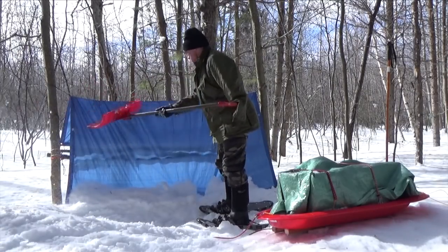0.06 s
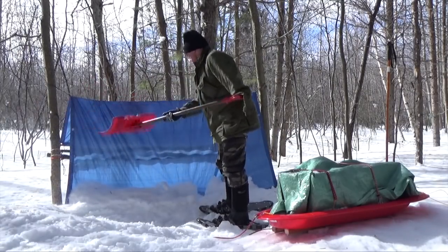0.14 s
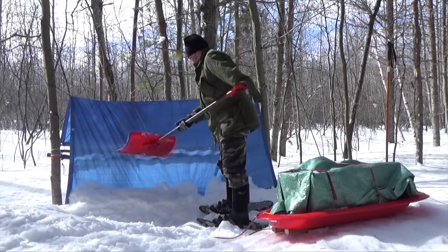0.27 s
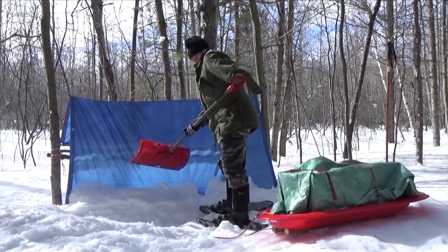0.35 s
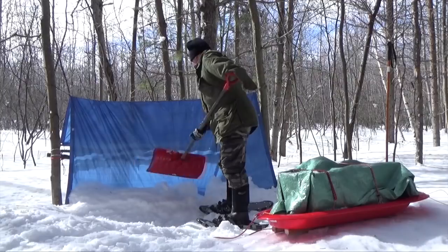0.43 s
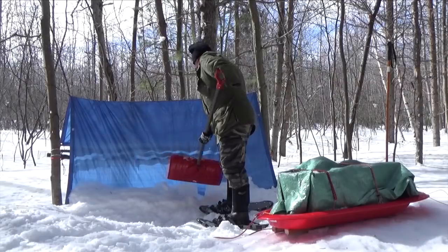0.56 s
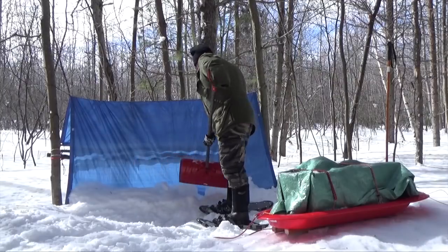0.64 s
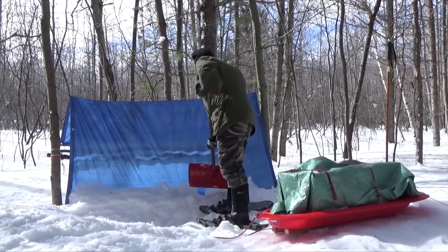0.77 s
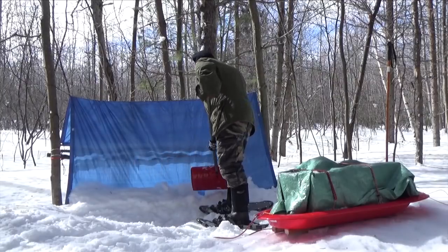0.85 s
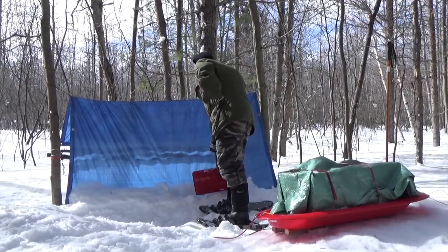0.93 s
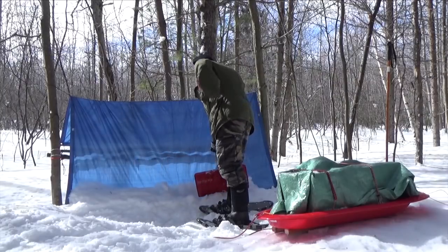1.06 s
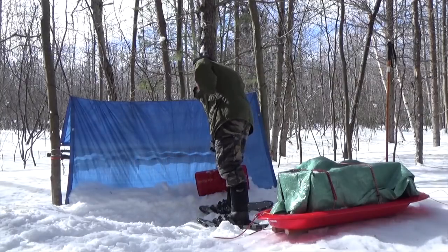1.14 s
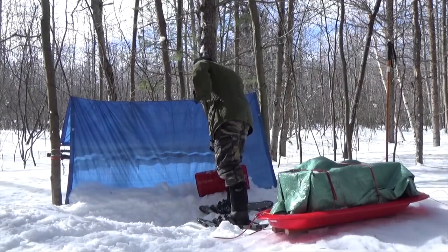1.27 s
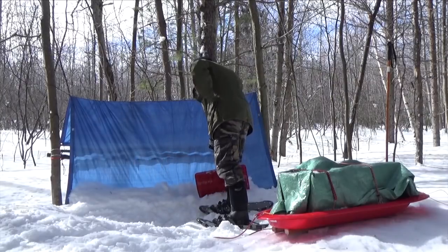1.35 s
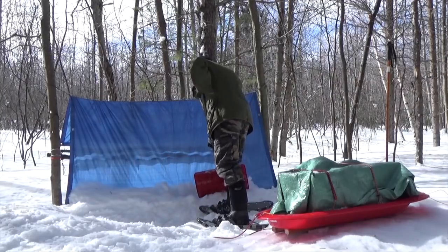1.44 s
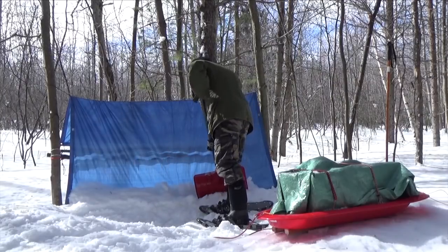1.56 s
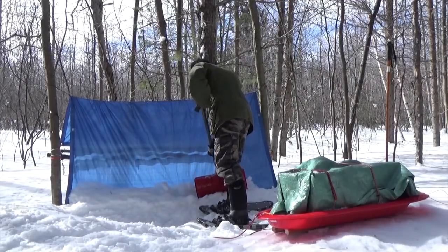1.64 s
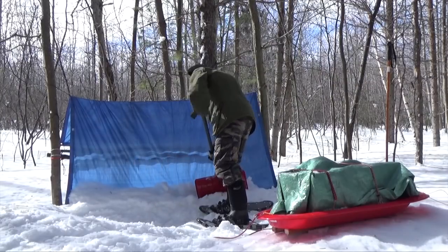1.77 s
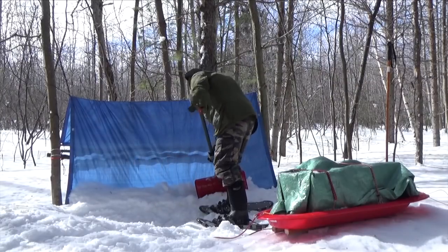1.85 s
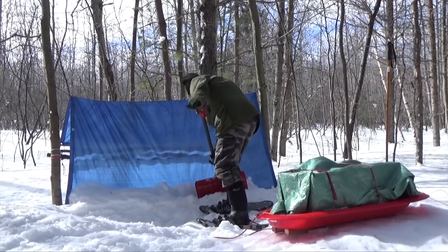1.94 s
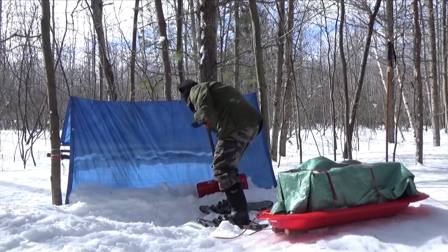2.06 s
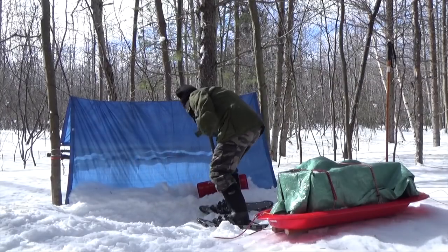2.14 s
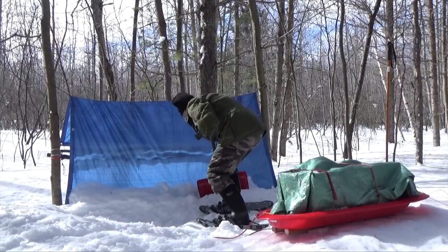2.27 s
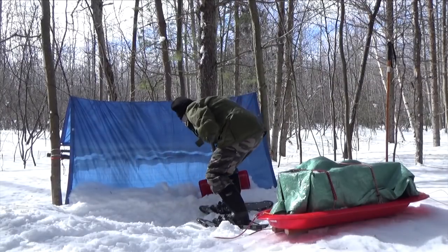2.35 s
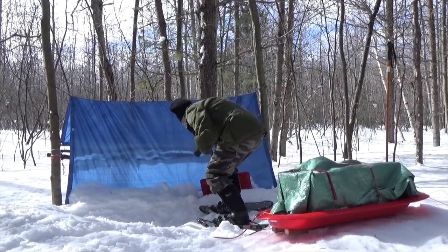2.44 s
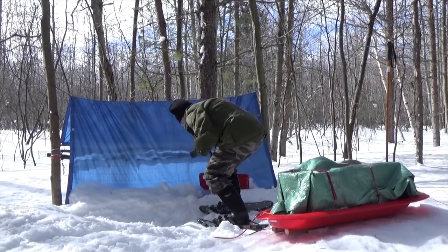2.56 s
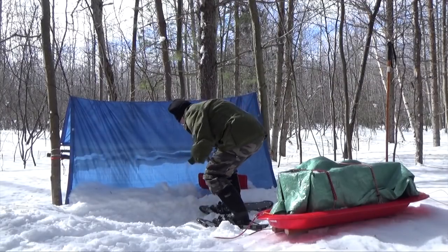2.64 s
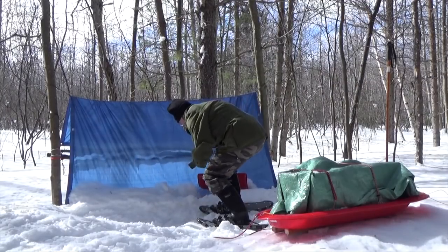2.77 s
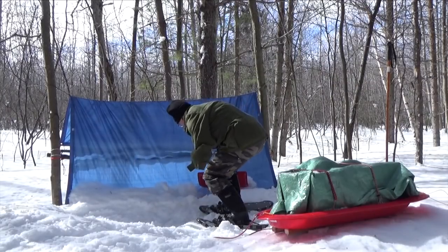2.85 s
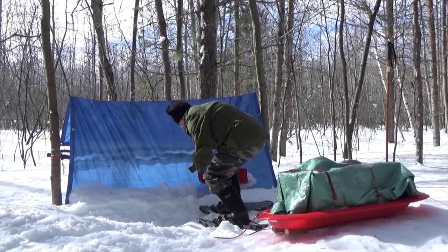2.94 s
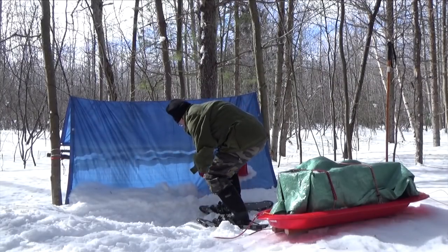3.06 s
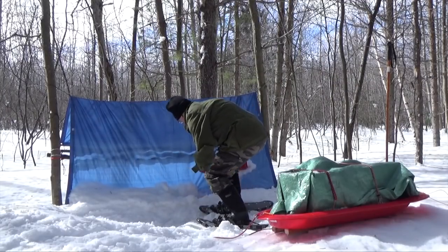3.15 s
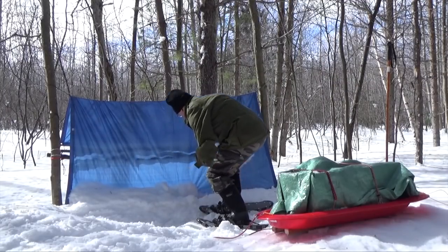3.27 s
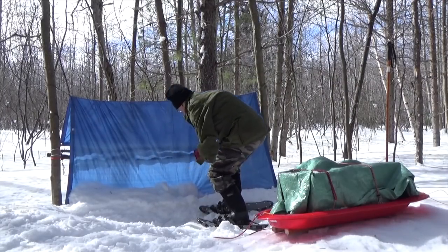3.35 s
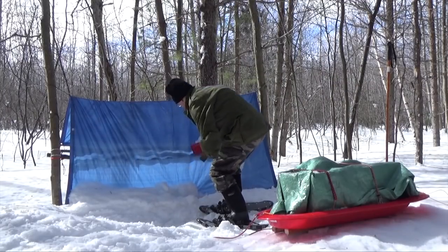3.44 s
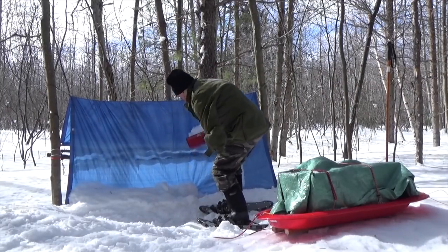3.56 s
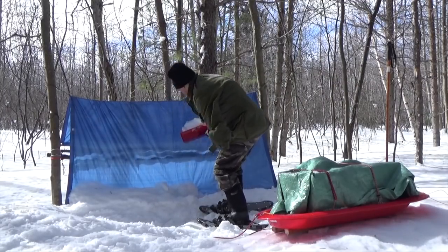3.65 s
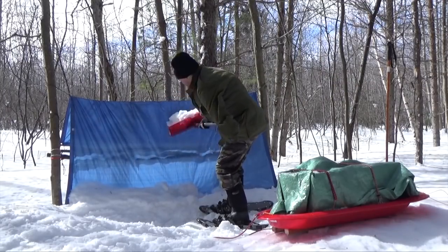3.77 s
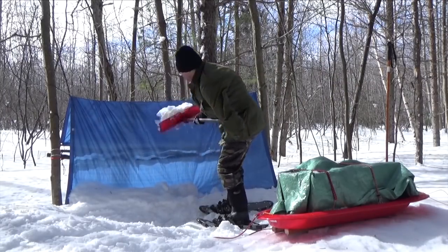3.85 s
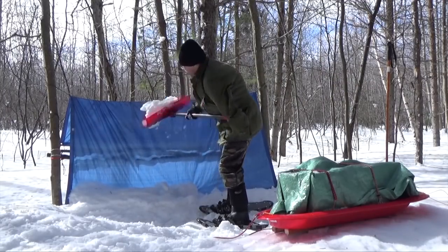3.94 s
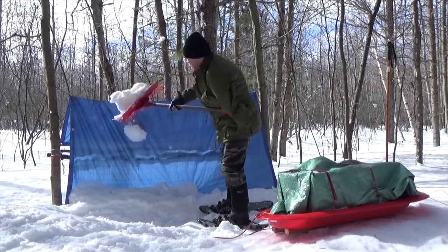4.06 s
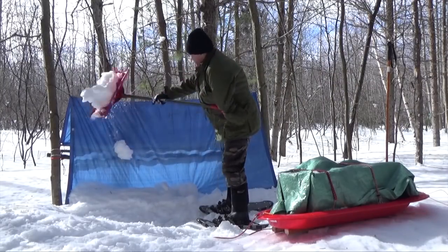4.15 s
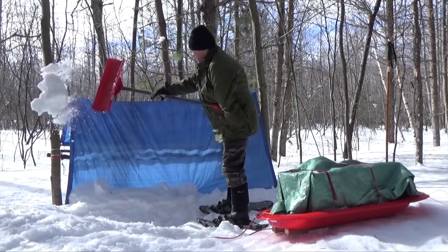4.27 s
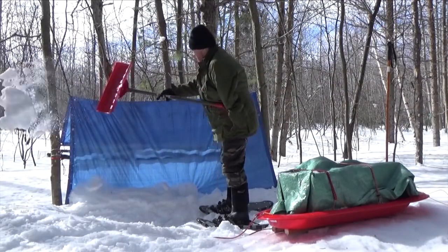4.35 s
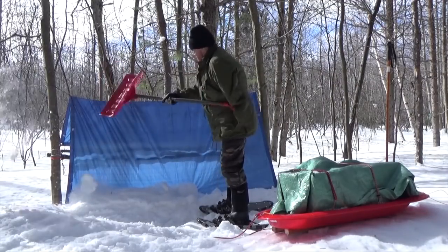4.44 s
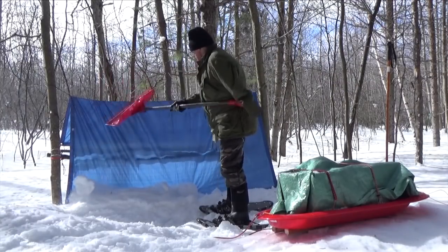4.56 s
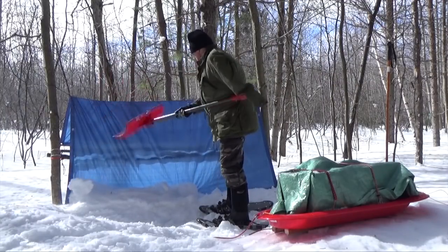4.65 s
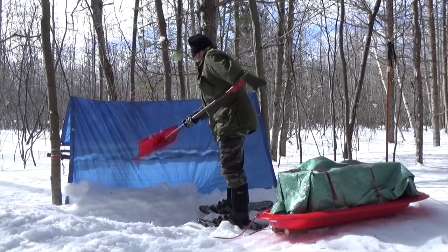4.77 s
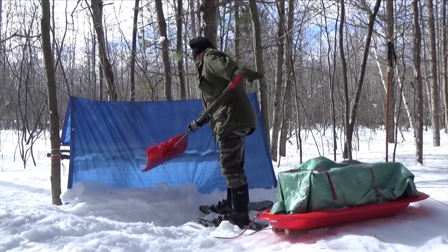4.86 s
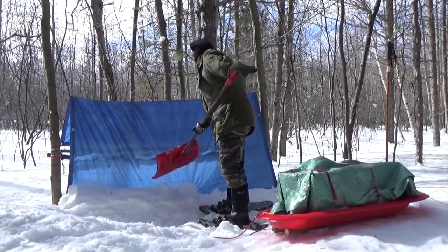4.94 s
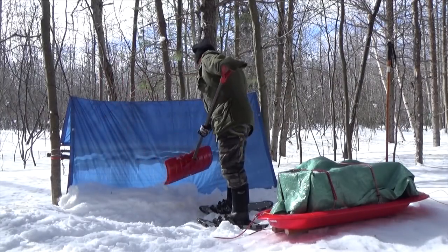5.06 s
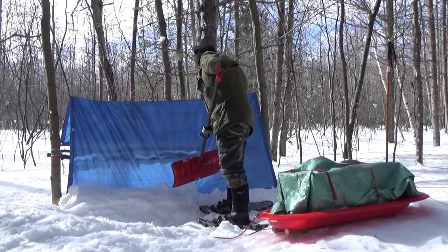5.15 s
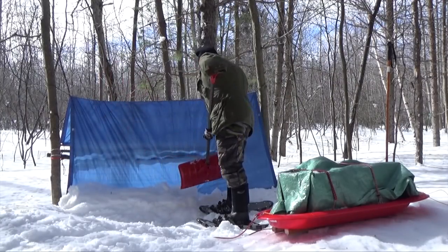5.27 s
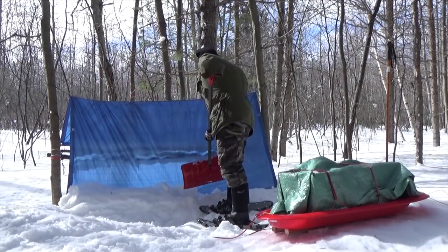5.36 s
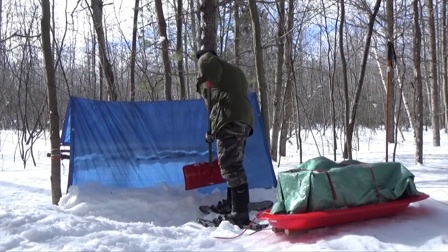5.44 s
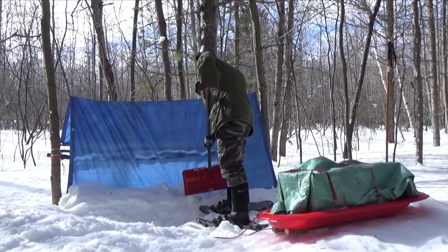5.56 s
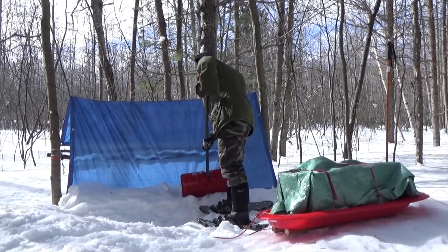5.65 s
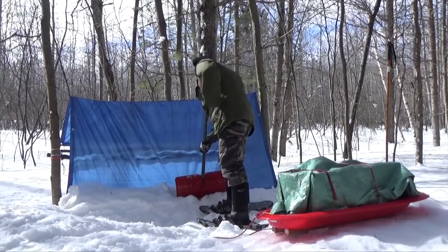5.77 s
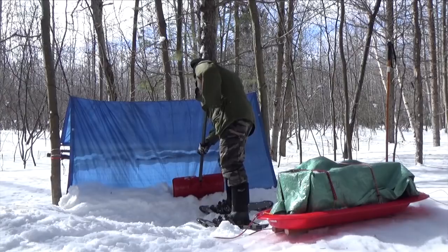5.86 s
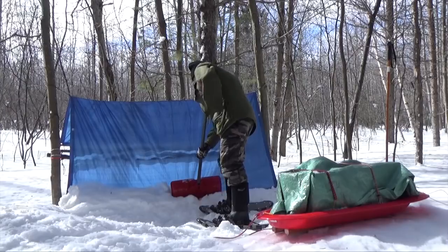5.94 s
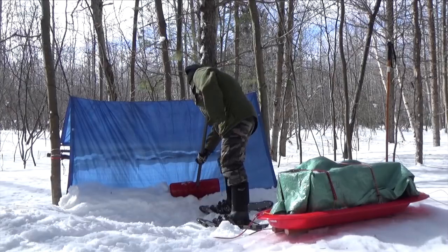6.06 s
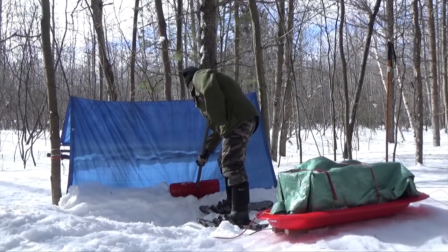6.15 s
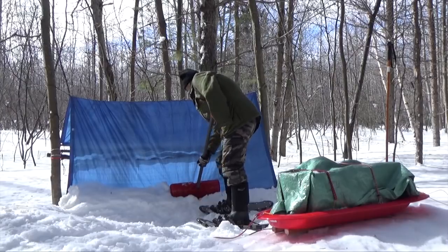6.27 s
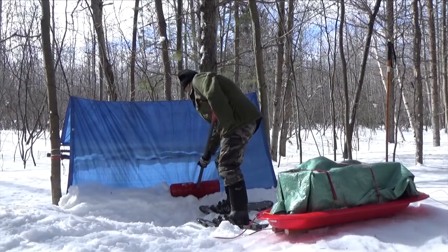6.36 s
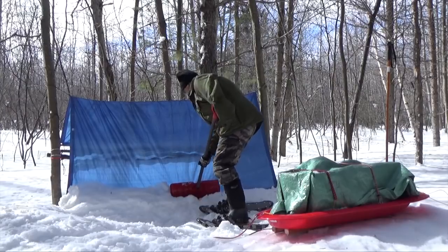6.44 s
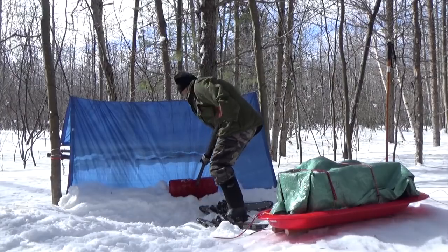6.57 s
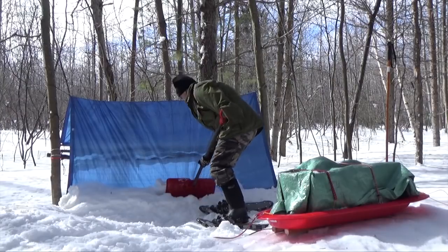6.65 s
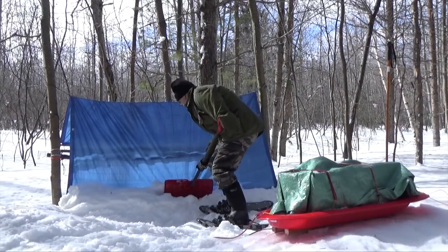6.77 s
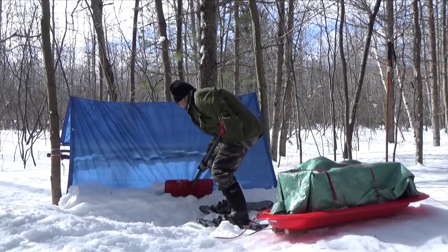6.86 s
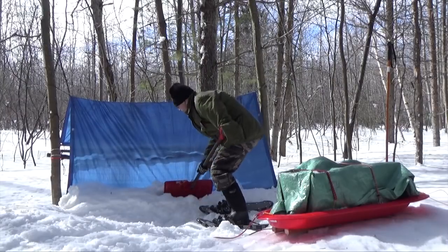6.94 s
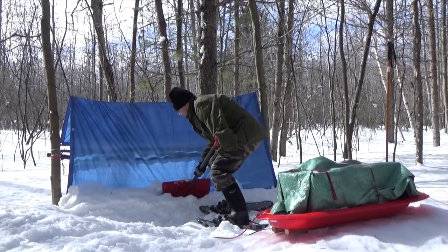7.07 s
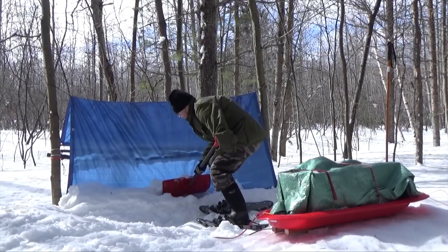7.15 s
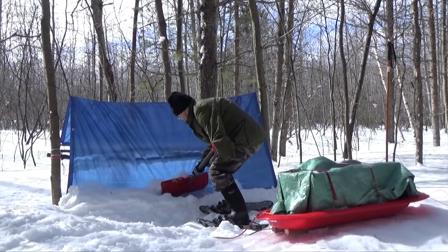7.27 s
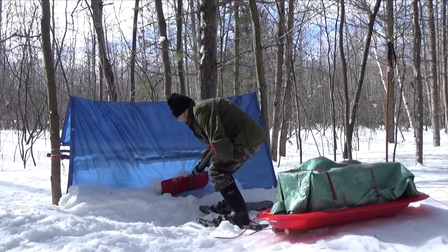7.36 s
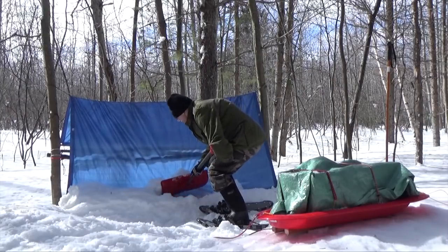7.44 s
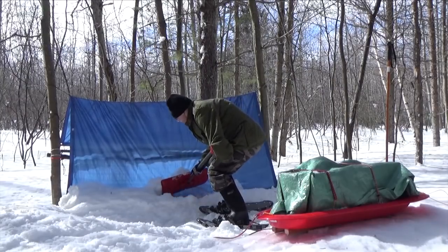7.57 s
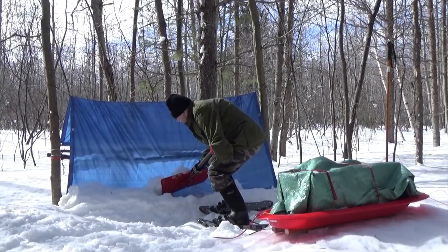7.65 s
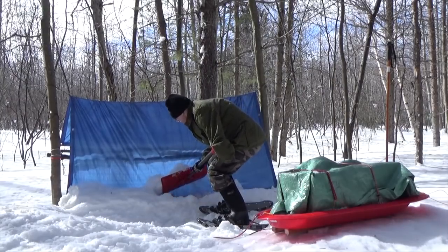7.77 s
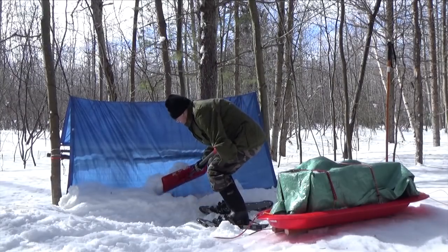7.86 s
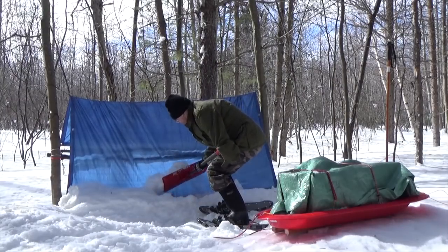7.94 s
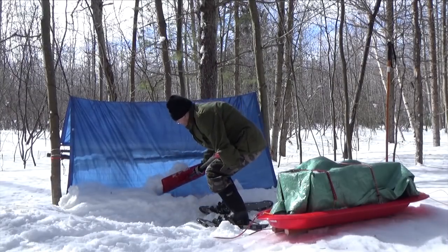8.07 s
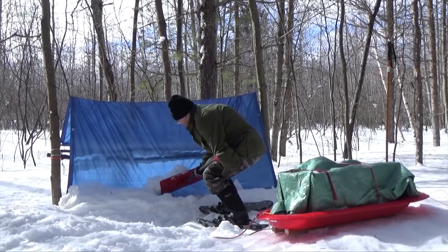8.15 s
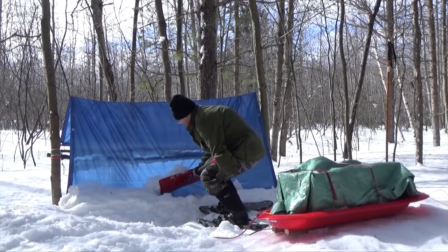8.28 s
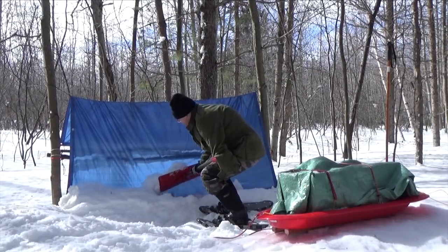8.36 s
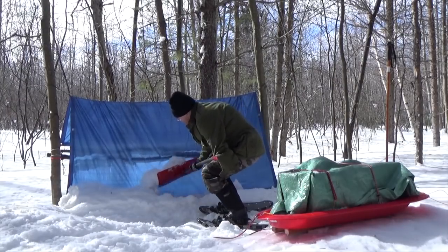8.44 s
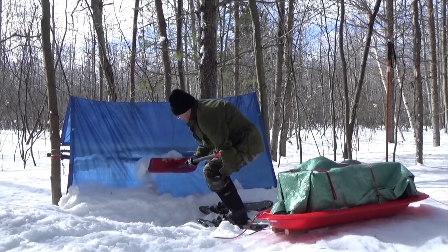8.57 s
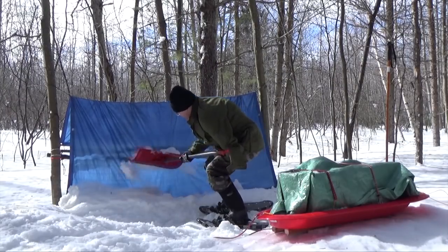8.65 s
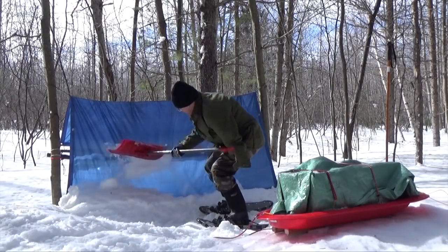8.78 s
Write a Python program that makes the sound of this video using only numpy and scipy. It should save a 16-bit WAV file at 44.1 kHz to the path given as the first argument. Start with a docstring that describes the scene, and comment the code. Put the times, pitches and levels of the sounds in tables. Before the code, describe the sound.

A plastic shovel crunches and scrapes into crusted snow, a quiet throw with soft powder patter, then a longer, sharply crackling dig in still woods.

```python
"""A plastic shovel cuts, scrapes and pries into crusted snow and throws it, a few metres away in a still wood.
Strokes are countless ice grains breaking on the blade: random clicks, coloured by its resonances.
Crust snaps are bursts of noise with a ring; knocks sound the blade modes; gear ticks, snow thumps.
Cloth swishes and pattering powder are gated fine grains. A faint hush, a drifting low murmur
and a faint echo of the shovel surround them."""
import sys
import numpy as np
from scipy import signal
from scipy.fft import rfft, irfft, next_fast_len
from scipy.io import wavfile
from scipy.ndimage import uniform_filter1d, minimum_filter1d

SR = 44100
rng = np.random.default_rng(int(sys.argv[2]) if len(sys.argv) > 2 else 0)


def file_out(sig):
    """Save sig as 16-bit WAV at sys.argv[1]."""
    # one column per channel
    cols = np.atleast_2d(sig).T
    # limit, then scale
    lim = np.clip(cols, -1, 1)
    pcm = np.round(lim * 32767).astype(np.int16)
    wavfile.write(sys.argv[1], SR, pcm)


N = 388521

# Table levels are before the gain trims of each layer; spectra are relative.
# Shoves of the blade. Each row: start in seconds, rise in seconds, hold in seconds, release in seconds,
# grinding level in dB, fizz of fine crystals in dB re grinding, blade flexing in dB re grinding.
SHOVES = [ (1.002, 0.029, .071, 0.036, -28.5, 7.5, -12), (1.131, 0.015, 0.018, 0.041, -34, 9, -5.5),
          (1.198, 0.064, .11, .04, -42, 9.5, -14), (1.415, 0.0063, 0.014, 0.094, -33.5, 8, -5.5),
          (1.483, 0.018, 0.0274, 0.083, -47.5, 11, -17), (1.588, 0.029, 0.12, 0.057, -29, 9, -9.5),
          (1.748, .008, .02, 0.089, -27.5, 9, -3.5), (1.918, 0.025, 0.064, .05, -49.5, 11, 3),
          (1.941, .11, 0.14, 0.064, -30.5, 10.5, -9.5), (2.273, .04, 0.014, 0.094, -29, 6.5, -19),
          (2.341, 0.074, .13, 0.16, -29.5, 8.5, -11.5), (2.602, 0.059, 0.12, 0.058, -31.5, 7, -18),
          (3.817, 0.13, 0.035, 0.11, -33, -1, -8.5), (5.766, 0.031, 0.005, 0.052, -34.5, 13, -16),
          (5.835, .03, 0.0078, 0.087, -48, 13.5, -23), (5.911, 0.052, 0.061, 0.077, -35.5, 8.5, -20.5),
          (6.039, 0.018, 0.026, 0.081, -32.5, 5, -19), (6.081, 0.061, 0.12, 0.057, -29.5, 6.5, -10.5),
          (6.537, 0.04, .03, 0.077, -34.5, 3.5, -16), (6.595, 0.15, 0.069, 0.16, -28, 8, -10),
          (6.847, 0.034, 0.024, 0.036, -35.5, 6.5, -16), (6.986, .08, 0.068, 0.13, -29.5, 9, -12),
          (7.189, 0.01, 0.084, 0.034, -31, 5.5, -17), (7.293, 0.012, 0.042, 0.16, -28, 8, -10.5),
          (7.428, 0.025, 0.15, 0.035, -36, 6.5, -11), (7.719, 0.046, 0.02, 0.038, -41, 10, -30),
          (8.139, 0.11, 0.011, 0.046, -32.5, 2.5, -22), (8.505, 0.044, 0.32, 0.14, -30, 7.5, -5.5), ]
# Swishes of cloth or loose powder. Each row: start in seconds, rise in seconds, hold in seconds,
# release in seconds, level in dB, treble in dB re level, left minus right in dB.
SWISHES = [ (0.0, 0.001, 0.071, 0.16, -51, -3.5, 2), (0.122, 0.0084, 0.0099, 0.16, -45, 0, 8),
           (0.174, 0.033, 0.21, 0.33, -58, 0.5, 5.5), (2.784, 0.037, 0.31, 0.36, -52, -3, -1.5),
           (3.23, 0.14, 0.77, 0.33, -54.5, -2.5, -0.5), (3.358, 0.045, .006, .03, -49.5, 8.5, 1.5),
           (4.173, 0.034, 0.0045, 0.042, -41.5, -6, 5), (4.352, 0.027, .02, 0.086, -41, 2.5, 2.5),
           (4.41, 0.014, 0.035, 0.81, -61.5, -4, 3.5), (4.664, 0.026, 0.052, 0.077, -44, -8, 8.5),
           (4.778, .02, .03, 0.14, -56, 0, 5), (4.86, 0.0066, 0.013, 0.14, -52, 5, 9),
           (4.97, 0.038, .01, 0.052, -43, 1, 6.5), (5.053, .02, 0.13, 0.28, -68, -2, 4),
           (7.948, 0.073, 0.6, .1, -57, -6, 2), ]
# Breaks of the crust. Each row: start in seconds, onset level in dB, treble tilt in dB.
CRUST_SNAPS = [(0.1325, -38, -8), (1.4216, -22, 13), (2.831, -29.5, 6), (2.921, -37, 14),
               (2.968, -35.5, 19), (2.977, -42, 22), (2.992, -34.5, 17), (3.187, -36.5, 14),
               (3.262, -38, 1), (4.6843, -34.5, -10), (4.8677, -33, 21), (4.9254, -32.5, 10),
               (6.6426, -21.5, -9), (6.888, -29, 10), (7.3853, -20.5, 24), (7.452, -17.5, 29),
               (7.4812, -15, 4), (7.556, -18.5, 8), (7.7, -35, 13), (7.717, -25, 46), (7.7312, -22, 6.5),
               (7.746, -24, 22), (7.765, -25, 8), (7.79, -19.5, 1), (7.805, -24, 0), (7.8913, -21.5, 3),
               (7.901, -22.5, 7), (7.9155, -18, 7), (7.9413, -22, 5), (7.9577, -20.5, 5), (8.0207, -36, 7),
               (8.212, -21.5, 12), (8.2493, -18.5, -4), (8.2579, -24, 11), (8.3754, -18.5, -12),
               (8.4296, -19, 8), (8.477, -24, 10)]
# Small clicks of the gear. Each row: start in seconds, onset level in dB, pitch in Hz, ring t60 in seconds.
GEAR_TICKS = [(0.546, -41, 5700, 0.03), (0.8565, -57, 10100, 0.072), (0.885, -53.5, 7980, 0.18),
              (3.5339, -45, 10200, 0.021), (3.5635, -44, 10800, 0.051), (4.3093, -35.5, 9650, 0.068),
              (5.0609, -46, 12700, 0.034), (6.468, -53.5, 8400, 0.21)]
# Knocks on the blade. Each row: time of strongest contact in seconds, level in dB, contact length in seconds,
# gain of the low modes in dB, factor on the ring time (snow on the blade damps it).
BLADE_KNOCKS = [(1.089, -35.5, 0.018, 20, 0.66), (3.407, -34.5, 0.0052, -24, 0.89),
                (3.75, -50.5, 0.011, 30, 0.13), (4.027, -29.5, .012, -11, 0.19),
                (4.209, -32, 0.01, -4.5, .5), (5.8, -32.5, 0.00373, -5.5, 1.6),
                (8.545, -34, 0.0061, 6, 0.18)]
# Thumps and treads in the snow. Each row: time in seconds, peak in dB, push length in seconds.
SNOW_THUMPS = [(0.46, -62.5, .035), (2.93, -63, 0.067), (3.442, -47, 0.0095), (4.116, -51.5, 0.0084),
               (5.331, -51.5, .009), (5.409, -56, 0.0056), (6.314, -55, .022)]
# Modes of the blade. Each row: frequency in Hz, level in dB, t60 in seconds before damping.
BLADE_MODES = [(552, -1.5, 0.25), (660, -0.5, .05), (1529, -1, .05), (1737, 0, 0.059), (2670, 1, 0.045),
               (3870, 3.5, 0.039), (6220, 3, 0.012)]
# Broad humps in the blade's radiation. Each row: centre in Hz, width in Hz, height in dB.
BLADE_HUMPS = [(800, 85, 4), (1133, 540, 1.5), (1680, 110, 4), (2860, 380, 7.5), (4330, 570, 2.5),
               (5750, 300, 2.5), (10680, 1900, 2.5)]
# Spectrum of breaking snow. Each row: frequency in Hz, density in dB per Hz.
CRUNCH_SPECTRUM = [(71, -88), (120, -27), (473, -14.5), (535, -9.5), (949, -11), (1680, -2.5), (2380, -4.5),
                   (2810, -6), (3740, -5), (6500, 0), (9210, 5), (13900, -10), (16000, -19)]
# Spectrum of cloth and powder. Each row: frequency in Hz, density in dB per Hz.
CLOTH_SPECTRUM = [(47, -57.5), (80, -47), (156, -9.5), (353, -28.5), (1200, -3), (1700, 5), (2270, 3.5),
                  (4050, 7), (9400, 1), (14600, -17.5), (16000, -29.5)]
# Spectrum of the air. Each row: frequency in Hz, density in dB per Hz.
AIR_SPECTRUM = [(18, -80), (30, -55.5), (100, -26), (374, -8.5), (404, -11.5), (584, -6.5), (666, -4.5),
                (1220, -4.5), (16000, -18.5)]
# Rise and fall of the low murmur. Each row: time in seconds, level in dB.
MURMUR_LEVEL = [(0, -52.5), (.95, -60.5), (1.8, -51), (3.3, -55), (5.3, -57.5), (5.72, -65), (6.3, -57),
                (7.7, -61), (8.8, -50.5)]
# Burial of the blade; deeper gives more bass in the flexing. Each row: time in seconds, depth from 0 to 1.
BLADE_DEPTH = [(1.0, 0.4), (1.8, 1), (2.8, 0.55), (6.2, 0.23), (7.3, 0.4), (8.5, .1)]

TAPS = 4096
TIME_S = np.arange(N) / SR
MOVE_TIME_S = TIME_S[:2 * SR]  # no movement lasts longer
HZ = np.fft.rfftfreq(TAPS, 1 / SR)
STROKE_BUILD_POWER, SWISH_BUILD_POWER = 1.31, 1.47  # gain rises as time to this power
STROKE_SWELL_DB = 2.5  # the push is hardest mid-shove
FIZZ_DB_PER_S = -14  # crisp crystals break first, then the snow packs
FLEX_DB_PER_S = 19.5  # the load on the blade grows along the shove
RELEASE_DB = 24  # fall over one release time
TRICKLE_DB, TRICKLE_S = -34.5, 0.21  # loosened snow runs on: level re the shove, decay time constant


def amp(db):
    """Decibels to gain."""
    return 10 ** (np.asarray(db) / 20)


def decay(t, t60_s):
    """Exponential fall of 60 dB in t60_s."""
    return amp(-60 * t / t60_s)


def evened(x):
    """Scales to rms 1."""
    return x / np.sqrt(np.mean(x ** 2) + 1e-20)


def read(points):
    """Gain of a spectrum table on the filter grid, interpolated over log frequency."""
    hz, db = np.transpose(points)
    return amp(np.interp(np.log(HZ + 1), np.log(hz + 1), db))


def add(mix, start_s, sound):
    """Adds a sound in place at start_s."""
    part = mix[max(round(start_s * SR), 0):][:len(sound)]
    part += sound[:len(part)]


def below(hz, order=4):
    """Low-pass magnitude."""
    return 1 / np.sqrt(1 + (HZ / hz) ** (2 * order))


def above(hz, order=4):
    """High-pass magnitude."""
    return np.sqrt(1 - below(hz, order=order) ** 2)


def colour(x, gain):
    """Minimum-phase filter with the shape of the given magnitude, peak gain 1."""
    log_gain = np.log(np.maximum(gain / gain.max(), 1e-5))
    circle = np.concatenate([log_gain, log_gain[-2:0:-1]])
    spectrum = np.exp(np.conj(signal.hilbert(circle)))
    return signal.oaconvolve(x, irfft(spectrum[:len(HZ)]))[:len(x)]


def wander(rate_hz):
    """Random motion of rms 1, up to about the given rate."""
    size = next_fast_len(N)
    hz = np.fft.rfftfreq(size, 1 / SR)
    spectrum = rfft(rng.standard_normal(size)) / (1 + (hz / rate_hz) ** 4)
    return evened(irfft(spectrum, size)[:N])


def grains(per_s, spread_db):
    """Clicks of random sign at random moments; a few are much larger than the rest."""
    size = amp(spread_db * np.minimum(rng.exponential(1, N), 4))
    return size * rng.choice([-1., 1.], N) * (rng.random(N) < per_s / SR)


def shifting(x, depth_db, frames=7, bins=1.0):
    """As the contact moves, resonances come and go in random patches of time and frequency."""
    z = signal.stft(x, nperseg=512, noverlap=384)[2]
    field = rng.standard_normal(z.shape)
    for axis, extent in enumerate([bins, frames]):
        bell = signal.windows.gaussian(41, extent / 2)
        field = signal.fftconvolve(field, np.expand_dims(bell, 1 - axis), "same")
    patched = z * amp(depth_db * evened(field))
    return signal.istft(patched, nperseg=512, noverlap=384)[1][:len(x)]


def scattered(clicks, t60_s, count=6):
    """Each grain strikes one of several spots and rings there with that spot's own decaying noise."""
    t, spot = TIME_S[:TAPS // 2], rng.integers(0, count, N)
    rings = rng.standard_normal((count, len(t))) * decay(t, t60_s)
    return sum(signal.oaconvolve(clicks * (spot == k), evened(ring))[:N] for k, ring in enumerate(rings))


def gesture(rise_s, hold_s, release_s, build_power):
    """Gain of one movement: it builds up, holds, and dies away."""
    build = np.minimum(MOVE_TIME_S / rise_s, 1) ** build_power
    released = np.clip((MOVE_TIME_S - rise_s - hold_s) / release_s, 0, 6)
    return build * amp(-RELEASE_DB * released)


def blade():
    """Colour of breaking snow as the plastic blade radiates it."""
    humps_db = sum(db / (1 + (2 * (HZ - hz) / width_hz) ** 2) for hz, width_hz, db in BLADE_HUMPS)
    return read(CRUNCH_SPECTRUM) * amp(humps_db)


def air(spread=0.26, hush_db=-73, murmur_db=-8.0, murmur_hz=1400):
    """A faint steady hush, and a low murmur that drifts."""
    spectrum = read(AIR_SPECTRUM)
    hush = np.array([evened(colour(n, spectrum)) for n in rng.standard_normal((2, N))])
    low = spectrum * below(murmur_hz, order=2)
    murmur = np.array([evened(colour(n, low)) for n in rng.standard_normal((2, N))])
    drift_db = np.interp(TIME_S, *np.transpose(MURMUR_LEVEL)) + wander(4.4)
    mid, side = amp(hush_db) * hush + amp(murmur_db + drift_db) * murmur
    return np.array([mid + spread * side, mid - spread * side])


def crumbs(per_s, t60_s, count=20):
    """Small icy crumbs land one by one, each a decaying sine with its own pitch."""
    t, out = TIME_S[:TAPS // 2], np.zeros(N)
    for place, pitch, size in rng.random((int(per_s * N / SR), 3)):
        hz = 2500 * 4.6 ** pitch
        ping = np.sin(2 * np.pi * hz * t) * decay(t, t60_s)
        add(out, place * N / SR, ping / np.sqrt(size + 1 / count))  # few are large
    return evened(out)


def crackle(per_s=45, t60_s=0.014, low_hz=3200, level_db=1.5):
    """Loose bits of crust crack and shift in the powder: sparse equal clicks with short rings."""
    bits = scattered(grains(per_s, 0), t60_s)
    return amp(level_db) * evened(colour(bits, read(CLOTH_SPECTRUM) * above(low_hz, order=2)))


def swishes(soft_db=3.0, bright_db=2.0, flutter_db=2.0, crumb_db=-5, split_hz=9000, low_hz=110, spread=0.067):
    """Cloth rubs and loose powder patters down: fine, soft grains with crumbs among them."""
    flutter = amp(flutter_db * wander(45))
    cloth = read(CLOTH_SPECTRUM) * above(low_hz, order=2)
    rub = shifting(grains(14000, 2.2) * flutter, 2.1)
    soft = amp(soft_db) * evened(colour(rub, cloth * below(split_hz)))
    soft = soft + amp(crumb_db) * (crumbs(110, 0.012) + crackle())
    bright = amp(bright_db) * evened(colour(rub, cloth * above(split_hz)))
    side = spread * evened(colour(rng.standard_normal(N), cloth * below(split_hz)))
    soft_power, bright_power = np.zeros((2, 2, N))
    for start_s, rise_s, hold_s, release_s, db, treble_db, pan_db in SWISHES:
        ears = amp(np.array([pan_db, -pan_db]) / 2)
        gain = amp(db) * gesture(rise_s, hold_s, release_s, SWISH_BUILD_POWER)
        for ear, share in enumerate(ears / ears.mean()):
            add(soft_power[ear], start_s, (share * gain) ** 2)
            add(bright_power[ear], start_s, (share * gain * amp(treble_db)) ** 2)
    return np.sqrt(soft_power) * np.array([soft + side, soft - side]) + np.sqrt(bright_power) * bright


def snaps(level_db=-5.0, crack_t60_s=0.019, ring_t60_s=0.055, ring_db=-5.0,
          low_hz=1200, ring_hz=4500, top_hz=12000, peaky=2.9):
    """A crack runs through the crust in a few milliseconds; the blade rings on a little, lower down."""
    out, t = np.zeros(N), TIME_S[:TAPS]
    body = blade() * above(low_hz, order=2)
    # ringing freely, the blade's resonances stand out more than in the crack
    free_ring = (blade() / read(CRUNCH_SPECTRUM)) ** (peaky - 1) * below(ring_hz, order=1)
    for start_s, db, treble_db in CRUST_SNAPS:
        crack_noise, ring_noise = rng.choice([-1., 1.], (2, TAPS))
        tilted = body * amp(treble_db * above(ring_hz, order=2)) * below(top_hz, order=2)
        spotted = shifting(crack_noise, 6.5, bins=6)
        crack = evened(colour(spotted * decay(t, crack_t60_s), tilted))
        ring = evened(colour(ring_noise * decay(t, ring_t60_s), tilted * free_ring))
        snap = (crack + amp(ring_db) * ring) * (1 - np.exp(-t / 0.00025))
        onset_rms = np.sqrt(np.mean(snap[:128] ** 2))
        add(out, start_s, amp(db + level_db) * snap / onset_rms)
    return out


def creep(low_hz=1200, top_hz=8000, trail_db=-25, settle_s=0.08):
    """After each snap sparse grains go on giving way, until the crust settles."""
    ringing = shifting(scattered(grains(2200, 13.0), 0.039), 2.1)
    power = np.zeros(N)
    for start_s, db, _ in CRUST_SNAPS:
        add(power, start_s, (amp(db + trail_db) * np.exp(-TIME_S[:SR] / settle_s)) ** 2)
    colouring = blade() * above(low_hz, order=2) * below(top_hz, order=1)
    return np.sqrt(power) * evened(colour(ringing, colouring))


def thumps(low_hz=135, top_hz=280, spread=0.53):
    """Clods drop and packed snow gives way with a dull push of low noise, spread across the ears."""
    out, t = np.zeros((2, N)), TIME_S[:SR // 2]
    for s, db, length_s in SNOW_THUMPS:
        for part in out:
            push = rng.standard_normal(len(t)) * t * np.exp(-t / length_s)
            thump = colour(push, above(low_hz) * below(top_hz, order=3))
            add(part, s - length_s / 2, amp(db) * thump / abs(thump).max())
    mid, side = out
    return np.array([mid + spread * side, mid - spread * side])


def ticks(click_width=0.16, ring_width=0.085, click_t60_s=0.0107, ring_db=7.0):
    """Light, bright clicks with a narrower ring: decaying noise in bands (widths re pitch)."""
    out, t = np.zeros(N), TIME_S[:TAPS]

    def band(hz, width, t60_s):
        """Decaying noise through one resonance."""
        resonance = 1 / np.sqrt(1 + ((HZ - hz) / (hz * width / 2)) ** 2)
        noise = rng.standard_normal(TAPS) * decay(t, t60_s)
        return evened(colour(noise, resonance * above(hz / 2, order=2)))

    for start_s, db, hz, t60_s in GEAR_TICKS:
        click = band(hz, click_width, click_t60_s)
        tick = click + amp(ring_db) * band(hz, ring_width, t60_s)
        onset_rms = np.sqrt(np.mean(tick[:128] ** 2))
        add(out, start_s, amp(db) * tick / onset_rms)
    return out


def shoves():
    """Gains of grinding, fizz and flexing: along each shove the fizz wanes and the blade load grows."""
    power = np.zeros((3, N))
    for start_s, rise_s, hold_s, release_s, db, fizz_db, flex_db in SHOVES:
        length_s = rise_s + hold_s + release_s
        elapsed_s = np.minimum(MOVE_TIME_S, length_s)
        from_middle_s = elapsed_s - (rise_s + hold_s / 2)
        swell = amp(STROKE_SWELL_DB * (np.sin(np.pi * elapsed_s / length_s) - 1.5))
        push = gesture(rise_s, hold_s, release_s, STROKE_BUILD_POWER) * swell
        run_on = np.exp(-(MOVE_TIME_S - elapsed_s) / TRICKLE_S)
        trickle = amp(TRICKLE_DB) * run_on * elapsed_s / length_s
        grinding = np.hypot(push, trickle)
        fizzing = np.hypot(push * amp(fizz_db + FIZZ_DB_PER_S * from_middle_s), trickle)
        flexing = push * amp(flex_db + FLEX_DB_PER_S * from_middle_s)
        for layer, gain in zip(power, [grinding, fizzing, flexing]):
            add(layer, start_s, (amp(db) * gain) ** 2)
    return np.sqrt(power)


def strokes(slip_db=1.5, flex_slip_db=3.5, grind_db=1.5, fizz_db=-2.5,
            low_hz=260, shallow_hz=800, flex_hz=1330, fizz_hz=4500, grain_t60_s=0.0057):
    """The edge sticks and slips; each slip breaks a clump of grains, and coarse lumps flex the blade."""
    grinding, fizzing, flexing = shoves()
    jerks = wander(62)
    slips = amp(slip_db * (jerks - uniform_filter1d(jerks, size=2400)))  # quick slips under a steady push
    coarse = shifting(scattered(grains(4000, 3.0) * slips, grain_t60_s), 3.4)
    crystals = shifting(grains(16000, 2.4) * slips, 3.0)
    lumps = grains(1300, 1.6) * slips * amp(flex_slip_db * wander(81))
    body = blade()
    grind = evened(colour(coarse, body * above(flex_hz) * below(fizz_hz)))
    fizz = evened(colour(evened(crystals) + 0.28 * evened(coarse), body * above(fizz_hz)))
    # a small plate radiates little bass, still less when shallow
    flex_body = body * below(flex_hz)
    buried = colour(shifting(lumps, 2.6, bins=2.4), flex_body * above(low_hz, order=1))
    shallow_lumps = shifting(grains(1400, 2.0) * slips, 4.3)
    shallow = colour(shallow_lumps, flex_body * above(shallow_hz, order=3))
    depth = np.clip(np.interp(TIME_S, *np.transpose(BLADE_DEPTH)), 0, 1)
    flex = np.sqrt(depth) * evened(buried) + np.sqrt(1 - depth) * evened(shallow)
    return amp(grind_db) * grinding * grind + amp(fizz_db) * fizzing * fizz + flexing * flex


def knocks(low_hz=900, scuff_db=-5.0):
    """A short gritty contact rings the modes of the blade."""
    out, t = np.zeros(N), TIME_S[:2 * TAPS]
    for s, db, length_s, low_db, ring_factor in BLADE_KNOCKS:
        press = (t / length_s) * np.exp(-2 * t / length_s)  # strongest at half the length
        contact = colour(rng.standard_normal(len(t)) * press, above(low_hz / 2))
        ring = np.zeros(len(t))
        for hz, mode_db, t60_s in BLADE_MODES:
            mode = decay(t, ring_factor * t60_s) * np.cos(2 * np.pi * hz * t)
            rung = evened(signal.fftconvolve(contact, mode)[:len(t)])
            ring += amp(mode_db + low_db * (hz < low_hz)) * rung
        knock = evened(ring) + amp(scuff_db) * evened(colour(contact, blade()))
        loudest_rms = np.sqrt(uniform_filter1d(knock ** 2, size=400).max())
        add(out, s - length_s / 2, amp(db) * knock / loudest_rms)
    return out


def wood(x, near_db=-48.5, near_t60_s=0.057, far_db=-38.0, far_t60_s=0.54, far_hz=5000):
    """Tarp and sled scatter the sound at once from the sides; the trunks return a faint, duller tail."""
    t = TIME_S[:SR]
    sparse = rng.standard_normal((3, SR)) * (rng.random((3, SR)) < .1) * (t > .002)
    near, *far = sparse
    near = colour(near * decay(t, near_t60_s), below(2 * far_hz, order=2))
    out = []
    for sign, taps in zip([1, -1], far):  # near echo opposite in the two ears
        tail = colour(taps * decay(t, far_t60_s), below(far_hz, order=1))
        echo = sign * amp(near_db) * near / np.linalg.norm(near) + amp(far_db) * tail / np.linalg.norm(tail)
        out.append(signal.oaconvolve(x, echo)[:N])
    return np.array(out)


def scene():
    """The shovel works straight ahead; swishes and powder lie mostly to the left."""
    shovel = strokes() + creep() + snaps() + knocks() + ticks()
    return shovel + wood(shovel) + swishes() + thumps() + air()


def record(dry, ceiling=0.28, edge_hz=16000):
    """A limiter holds down the sharpest peaks, both ears alike; then a low-pass limits the band."""
    allowed = np.minimum(1, ceiling / (abs(dry).max(0) + 1e-9))
    held = minimum_filter1d(allowed, size=65)
    limited = dry * uniform_filter1d(held, size=65)
    low_pass = signal.firwin(511, edge_hz, window=("kaiser", 9), fs=SR)
    return signal.oaconvolve(limited, low_pass[None], "same")


dry = scene()
out = record(dry)
file_out(out)
```